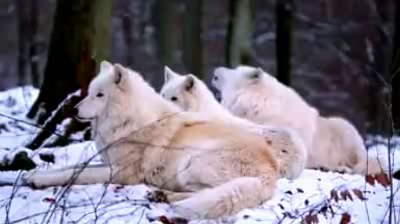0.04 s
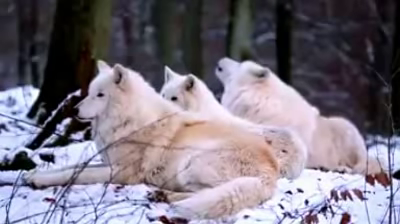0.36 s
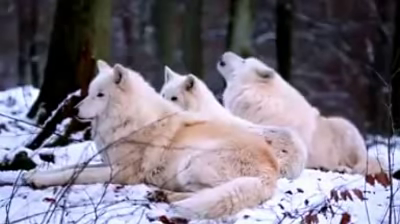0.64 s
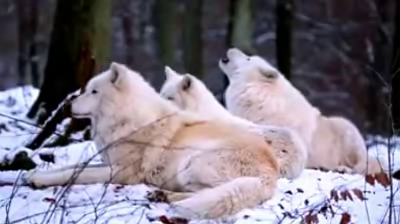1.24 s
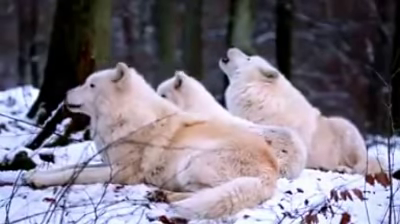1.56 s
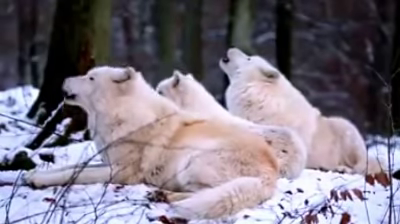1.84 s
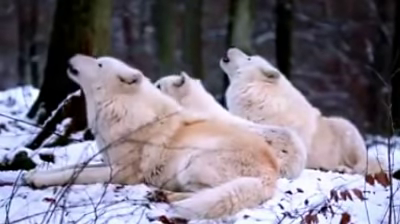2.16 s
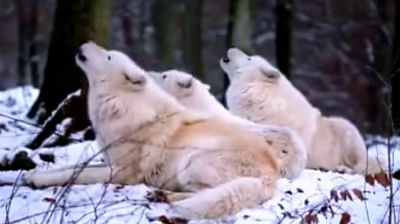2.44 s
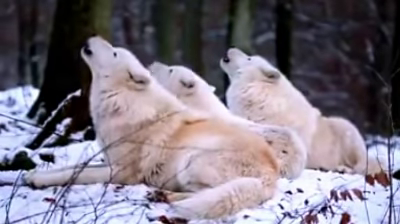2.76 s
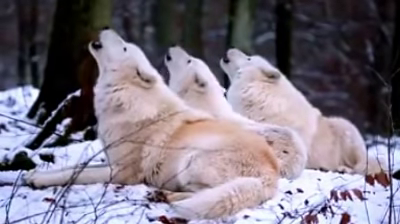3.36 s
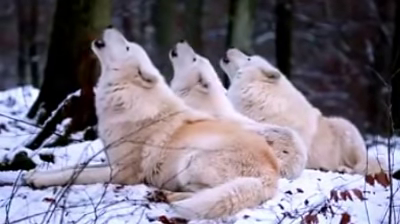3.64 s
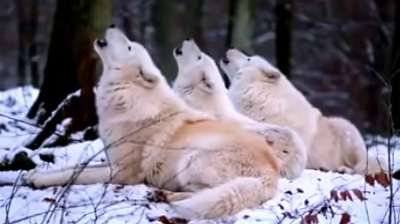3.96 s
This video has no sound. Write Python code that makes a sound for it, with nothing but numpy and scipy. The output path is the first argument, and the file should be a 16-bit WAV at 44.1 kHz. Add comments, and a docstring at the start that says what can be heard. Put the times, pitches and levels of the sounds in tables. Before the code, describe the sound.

Wolves howl in long overlapping tones over a faint hiss in a snowy forest.

```python
"""A far wolf howl sinks away over a steady hiss in a snowy forest. After a thin whine, a near wolf slides
up into one long, almost pure note; a second joins low, then breaks upward to a higher, airy note.
Each near voice is a strong fundamental with weak overtones, coloured by the throat and frayed while
hoarse. Trunks smear the howls and give a faint echo. Underneath lie a soft rush, dull bumps at the
microphone, a few rustles and one dry tick."""
import sys
import numpy as np
from scipy import signal
from scipy.fft import rfft, irfft
from scipy.io import wavfile
from scipy.ndimage import uniform_filter1d

SR = 44100
rng = np.random.default_rng(int(sys.argv[2]) if len(sys.argv) > 2 else 0)


def store_pcm(level_fs):
    """Save levels as 16-bit WAV."""
    pcm = np.round(np.clip(level_fs, -1, 1) * 32767).astype(np.int16)
    wavfile.write(sys.argv[1], SR, np.atleast_2d(pcm).T)


N = 176400
TIME = np.arange(N) / SR

# far wolf's falling howl: t/s, f/Hz, fundamental/dB, overtones/dB
FAR_HOWL = [(0, 453.2, -55, -71), (.14, 435, -50.5, -58), (.27, 423, -47.5, -56.5), (.39, 413, -60.5, -75),
            (.46, 407.8, -39.5, -55.5), (.505, 403, -52, -73), (.555, 394.3, -39.5, -64),
            (.61, 382.4, -62, -64), (.66, 378, -45.5, -57.5), (.72, 367, -55.5, -69), (.8, 359, -50, -71),
            (.9, 360.2, -43, -69), (1.05, 358, -45.5, -61), (1.16, 345, -78, -87)]
# colour of the hiss: f/Hz, relative level/dB
HISS_COLOUR = [(15, -23), (28, -5.5), (75, -6), (130, -6), (220, -10.5), (400, -9.5), (680, -9.5),
               (900, -13), (1150, -18.5), (1450, -14.5), (2200, -18.5), (3500, -22), (4300, -20),
               (5500, -27), (8000, -28), (12000, -34), (14500, -43)]
# colour of the midrange rush: f/Hz, relative level/dB
RUSH_COLOUR = [(100, -16.5), (250, -0.5), (450, 6), (800, -3), (1300, -2.5), (2000, -7.5), (4000, -11),
               (6000, -31)]
# fader ride of the rush: t/s, level/dB
RUSH_LEVEL = [(0, -51), (.14, -48.5), (.35, -53), (.7, -53), (1.1, -54.5), (2, -66), (3, -73), (4, -59.5)]
# stereo width of the noise layers: f/Hz, side against mid/dB
NOISE_WIDTH = [(60, -27.5), (400, -28), (2000, -19), (8000, -15.5), (14000, -19.5)]
# dull bumps: t/s, envelope peak/dB, f/Hz
BUMPS = [(.462, -44.5, 57), (0.97, -36, 109), (1.017, -31, 93), (1.031, -37, 59.7), (1.436, -40, 73.6),
         (2.231, -43, 65.03), (2.256, -29.5, 85.2), (2.282, -22.5, 91), (2.311, -35, 95),
         (2.355, -28.5, 135.8), (2.375, -38, 80)]
# thin whine: t/s, f/Hz, level/dB
WHINE = [(.74, 1540, -80), (.82, 1564, -57), (.93, 1532, -58), (1.02, 1529, -58), (1.12, 1570, -62),
         (1.2, 1570, -80)]
# soft rustles: peak t/s, half length/s, level/dB, centre f/Hz
RUSTLES = [(0.833, 0.017, -58, 5860), (1.113, 0.031, -60, 6950), (1.296, 0.043, -62, 7150),
           (1.7, 0.42, -66, 5870), (1.94, 0.021, -54.5, 7100), (2.066, 0.051, -56, 5900),
           (2.162, 0.021, -54.5, 6060), (2.3, 0.12, -62.5, 4435), (2.933, 0.048, -67, 9100)]
# lead wolf's melody: t/s, f/Hz
LEAD_PITCH = [(.95, 216), (1.0, 237), (1.06, 269), (1.12, 295.3), (1.2, 314), (1.28, 331.4), (1.37, 341.3),
              (1.5, 350.5), (1.72, 353.5), (1.92, 352), (2.1, 348.7), (2.3, 341.5), (2.55, 334.3),
              (2.82, 328.9), (3.15, 326.7), (3.6, 326.2), (3.8, 324.5), (4, 317.9)]
# its fundamental: t/s, level/dB
LEAD_LEVEL = [(.94, -63), (.968, -36), (1.06, -39), (1.125, -25.5), (1.175, -31), (1.22, -23.5),
              (1.28, -23), (1.305, -24.5), (1.368, -23.5), (1.39, -38), (1.41, -24.5), (1.52, -26.5),
              (1.54, -22.5), (1.62, -27), (1.65, -30.5), (1.71, -25.5), (1.755, -32.5), (1.81, -28),
              (1.92, -27.5), (1.95, -29), (2.07, -25), (2.14, -31.5), (2.21, -25), (2.245, -27.5),
              (2.271, -40), (2.3, -28), (2.345, -33.5), (2.39, -25), (2.432, -34), (2.49, -23.5),
              (2.54, -25), (2.61, -22), (2.7, -26.5), (2.77, -24), (2.85, -26.5), (2.95, -22.5),
              (3.12, -21), (3.35, -20.5), (3.49, -19), (3.58, -19), (3.74, -19), (3.9, -24), (4, -26)]
# its harmonics: t/s, second/dB, third/dB, higher ones before the throat/dB
LEAD_OVERTONES = [(.93, -73, -75, -80), (1.0, -39, -52.5, -59), (1.06, -45, -45.5, -71),
                  (1.12, -49.5, -52.5, -65.5), (1.28, -39, -53.5, -57), (1.45, -37.5, -47.5, -49),
                  (1.62, -41, -46, -48.5), (1.8, -47, -41.5, -48), (2.07, -43.5, -45.5, -48.5),
                  (2.2, -44, -48, -52), (2.6, -46, -39, -55.5), (2.9, -51, -47, -54),
                  (3.25, -46, -41.5, -54.5), (3.48, -47.5, -37.5, -52), (3.7, -48, -38.5, -57),
                  (3.82, -48, -36, -63), (4, -58.5, -35.5, -63)]
# its throat's colour on the higher harmonics: f/Hz, gain/dB
LEAD_THROAT = [(1000, -10), (1310, 2), (1410, -2.5), (1570, -4), (1750, -9), (1960, -8), (2100, -16.5),
               (2290, -9), (2460, -8.5), (2750, -27), (3700, -23.5), (4250, -22)]
# a narrow, moving throat resonance that picks out one overtone after another: t/s, f/Hz, gain/dB
LEAD_RING = [(1.1, 1544, 4), (1.21, 1550, 11), (1.32, 1705, 1.5), (1.5, 2450, -4), (1.62, 2470, 5),
             (1.8, 2453, -8), (2.03, 2470, 1.5), (2.15, 1734, 5), (2.4, 1702, 8.5), (2.6, 1681, -1.5),
             (2.85, 1690, 5.5), (3.15, 1925, 7), (3.5, 1990, 8.5), (3.63, 1955, 10), (3.75, 1955, 3)]
# its hoarseness: t/s, amount/0-1
LEAD_HOARSE = [(.95, .4), (1.15, .6), (1.35, .4), (1.9, .22), (2.3, .35), (2.65, .15), (4, .1)]
# moments when the stereo image opens: start t/s, end t/s
OPENINGS = [(1.202, 1.29), (1.48, 1.556), (1.81, 1.89), (2.28, 2.36), (2.47, 2.85), (3.26, 3.52),
            (3.861, 4)]
# joining wolf's howl: t/s, f/Hz, fundamental/dB, second harmonic/dB, higher ones before the throat/dB
JOINER_HOWL = [(3.1, 276, -74.5, -56.5, -73.5), (3.26, 275, -64, -47, -76),
               (3.29, 273.6, -41.5, -52.5, -62), (3.37, 297.2, -36, -43.5, -51),
               (3.42, 316, -34.5, -44.5, -55.5), (3.5, 339, -27, -36.5, -62.5),
               (3.556, 362.8, -30.5, -41, -40.5), (3.567, 439.7, -27.5, -44.5, -61.5),
               (3.6, 460, -21.5, -44, -47), (3.63, 464.6, -21.5, -43, -44), (3.69, 461.7, -22.5, -45, -44),
               (3.75, 467, -19, -47, -44), (3.82, 469.3, -22, -49.5, -43), (3.91, 470.3, -23, -46, -45.5),
               (4, 469.4, -19, -53, -44)]
# its throat's colour on the higher harmonics: f/Hz, gain/dB
JOINER_THROAT = [(820, -7.5), (1060, -2), (1410, -8.5), (1600, -31), (1880, -23.5), (2350, -13.5),
                 (2800, -25), (3760, -30)]
# its piercing ninth harmonic: t/s, level/dB
JOINER_EDGE = [(3.54, -80), (3.58, -64), (3.67, -61), (3.745, -66), (3.772, -53.5), (3.86, -55),
               (3.94, -51), (4, -50.5)]
# its hoarseness: t/s, amount/0-1
JOINER_HOARSE = [(3.1, .7), (3.4, 0.59), (3.5, 0.44), (3.57, 0.83), (3.63, .25), (4, 0.066)]
# colour of the air in its voice: f/Hz, relative level/dB
AIR_COLOUR = [(80, -19), (300, 0), (700, 10), (1100, -20), (1600, 1), (3000, -29), (4400, -11.5),
              (5800, -17), (9000, -13), (12000, -22.5), (15000, -42)]
# colour of the tick: f/Hz, relative level/dB
TICK_COLOUR = [(1000, -32.5), (1900, 3), (3000, -0.5), (3900, 4), (5000, -8.5), (7500, -8.5), (10000, -19),
               (14000, -29.5)]


def from_db(db):
    """Decibels to gain."""
    return 10 ** (np.asarray(db) / 20)


def rms_one(x):
    """Scale to unit rms."""
    return x / np.sqrt(np.mean(x ** 2) + 1e-20)


def in_time(rows):
    """One smooth automation curve for each column after the time."""
    times, *columns = np.transpose(rows)
    return [uniform_filter1d(np.interp(TIME, times, column), size=300) for column in columns]


def at_hz(points, hz):
    """Read an EQ curve in dB on a log-frequency axis."""
    f, db = np.transpose(points)
    return np.interp(np.log(hz), np.log(f), db)


def drift(rate_hz):
    """Smooth random modulation with spread 1."""
    step, run_in = 40, 2000
    pole = np.exp(-2 * np.pi * rate_hz * step / SR)
    white = rng.standard_normal(N // step + run_in + 2)
    slow = signal.lfilter([1], [1, -2 * pole, pole * pole], white)[run_in:]
    return np.interp(np.arange(N) / step, np.arange(len(slow)), rms_one(slow))


def stereo(mid, side):
    """Left and right from mid and side."""
    return mid + side * np.array([[1], [-1]])


def pan(x, db):
    """Place a sound by its left-right level difference."""
    return x * from_db([[db / 2], [-db / 2]])


def tone(hz):
    """A sine of rms 1 that follows a pitch curve."""
    return np.sqrt(2) * np.sin(2 * np.pi * np.cumsum(hz) / SR)


def noise(colour):
    """Narrow stereo noise of a given colour, rms 1."""
    hz = np.maximum(np.fft.rfftfreq(N, 1 / SR), 1)
    mid, side = rfft(rng.standard_normal((2, N))) * from_db(at_hz(colour, hz))
    side *= from_db(at_hz(NOISE_WIDTH, hz))
    return rms_one(stereo(irfft(mid, N), irfft(side, N)))


def far_wolf(waver=.025, flutter_db=3):
    """A wavering, sinking howl, blurred by the trees and heard from one direction."""
    hz, db, overtones_db = in_time(FAR_HOWL)
    hz = hz * (1 + waver * drift(71))
    overtones = tone(2 * hz) + tone(3 * hz)
    howl = from_db(db) * tone(hz) + from_db(overtones_db) * overtones
    flutter = from_db(flutter_db * drift(10))
    return scattered(howl * flutter * (TIME < FAR_HOWL[-1][0]), share=.6)


def scattered(x, share):
    """Part of the sound arrives by way of the trunks: glides smear, held tones swell and fade."""
    return np.sqrt(1 - share) * x + np.sqrt(share) * forest(x, t60_s=.5)[0]


def forest(x, t60_s, build_s=.022, dull_hz=2940):
    """Dull, dying scatter from many trunks, different on each side."""
    t = TIME[:SR]
    echoes = rng.standard_normal((2, SR)) * from_db(-60 * t / t60_s) * (1 - np.exp(-t / build_s))
    echoes /= np.sqrt(np.sum(echoes ** 2, axis=1, keepdims=True))
    echoes = signal.sosfilt(signal.butter(1, dull_hz, fs=SR, output="sos"), echoes)
    return signal.fftconvolve(x[None], echoes, axes=1)[:, :N]


def hiss(level_db=-50, patch_db=1.8, patch_hz=260, patch_s=.1):
    """A steady bed of noise in which narrow bands swell and thin at random."""
    hz, times, bands = signal.stft(noise(HISS_COLOUR), SR, nperseg=1024)
    swell = rng.standard_normal(bands.shape[1:])
    swell = uniform_filter1d(swell, size=round(patch_hz / hz[1]), axis=0)
    swell = uniform_filter1d(swell, size=round(patch_s / times[1]), axis=1)
    _, patchy = signal.istft(bands * from_db(patch_db * rms_one(swell)), SR, nperseg=1024)
    return from_db(level_db) * rms_one(patchy[:, :N])


def rush():
    """Soft midrange noise that fades early and creeps back at the end."""
    db, = in_time(RUSH_LEVEL)
    return from_db(db) * noise(RUSH_COLOUR)


def bumps(rise_cycles=.48):
    """Each soft knock swells and dies within about two low cycles."""
    out = np.zeros(N)
    for start, db, hz in BUMPS:
        cycles = np.maximum(TIME - start, 0) * hz
        age = cycles / rise_cycles
        envelope = (age * np.exp(1 - age)) ** 2
        out -= from_db(db) * envelope * np.sin(2 * np.pi * cycles)
    return out


def whine(waver=.0107):
    """A faint, unsteady high tone that leads into the first near howl."""
    hz, db = in_time(WHINE)
    gate = (TIME > WHINE[0][0]) & (TIME < WHINE[-1][0])
    return from_db(db) * tone(hz * (1 + waver * drift(71))) * gate


def rustles(half_width_octaves=.28):
    """Bell-shaped swells of bright noise."""
    out = np.zeros(N)
    for peak_s, half_s, db, hz in RUSTLES:
        edges = hz * 2 ** (half_width_octaves * np.array([-1, 1]))
        band = signal.sosfilt(signal.butter(2, edges, "band", fs=SR, output="sos"), rng.standard_normal(N))
        swell = np.exp(-.5 * ((TIME - peak_s) / half_s) ** 2)
        out += from_db(db) * rms_one(band) * swell
    return out


def lead_wolf(ring_half_width_hz=97, tremble_settle_s=.47, wobble_settle_s=.97):
    """One long howl that slides up with a rough tremble, calms and slowly sags."""
    hz, = in_time(LEAD_PITCH)
    db, = in_time(LEAD_LEVEL)
    hoarse, = in_time(LEAD_HOARSE)
    second_db, third_db, upper_db = in_time(LEAD_OVERTONES)
    ring_hz, ring_db = in_time(LEAD_RING)
    overtones_db = [second_db, third_db]
    for harmonic in range(4, 13):
        detune = (harmonic * hz - ring_hz) / ring_half_width_hz
        throat_db = at_hz(LEAD_THROAT, harmonic * hz) + ring_db / (1 + detune ** 2)
        overtones_db.append(upper_db + throat_db)
    age = TIME - LEAD_LEVEL[0][0]
    tremble = 1 + .39 * np.exp(-np.abs(age) / tremble_settle_s) * drift(13.5)
    wobble = 1 + .0088 * np.exp(-np.abs(age) / wobble_settle_s) * drift(14)
    return voice(hz * wobble, db, overtones_db, hoarse) * tremble * (age > 0)


def voice(hz, fundamental_db, overtones_db, hoarse, waver=.0019, rasp=.017):
    """A fundamental and its overtones, frayed and smeared while hoarse, clean once the voice settles."""
    hz = hz * (1 + waver * drift(10.1) + rasp * hoarse * drift(71))
    overtones = 0
    for harmonic, db in enumerate(overtones_db, start=2):
        shimmer_db = .4 * (harmonic - 1) * drift(15)  # higher overtones flutter more
        overtones += from_db(db - shimmer_db) * frayed_tone(harmonic * hz, hoarse)
    return from_db(fundamental_db) * tone(hz) + scattered(overtones, share=.5 * hoarse ** 2)


def frayed_tone(hz, hoarse):
    """A sine of rms 1 that blends with a narrow band of noise as the voice grows hoarse."""
    phase = 2 * np.pi * np.cumsum(hz) / SR
    blend = .62 * hoarse
    fray = drift(55) * np.sin(phase) + drift(55) * np.cos(phase)
    return np.sqrt(1 - blend ** 2) * tone(hz) + blend * fray


def joining_wolf(air_db=-28.5, air_follows=.79):
    """A low rising moan that breaks upward into a loud, airy high note."""
    hz, db, second_db, upper_db = in_time(JOINER_HOWL)
    edge_db, = in_time(JOINER_EDGE)
    hoarse, = in_time(JOINER_HOARSE)
    higher_db = [upper_db + at_hz(JOINER_THROAT, harmonic * hz) for harmonic in range(3, 9)]
    howl = voice(hz, db, [second_db, *higher_db, edge_db], hoarse)
    peak_db = db.max()  # the air rides the fundamental, air_db below it at the peak
    air = from_db(peak_db + air_db + air_follows * (db - peak_db)) * noise(AIR_COLOUR)
    return (howl + air) * (TIME > JOINER_HOWL[0][0])


def tick(peak_s=3.326, level_db=-41.5, attack_s=.003, decay_s=.011):
    """One quick, dry burst of bright noise."""
    age = TIME - peak_s
    envelope = np.exp(-np.maximum(-age / attack_s, age / decay_s))
    return from_db(level_db) * envelope * noise(TICK_COLOUR)


def stereo_image(x, fade_s=.036, narrow_db=-42.5, open_db=7.5):
    """The mix sits in the centre and widens for moments during the howls."""
    opening = np.zeros(N)
    for start, end in OPENINGS:
        inside_s = np.minimum(TIME - start, end - TIME)
        opening += np.clip(inside_s / fade_s + .5, 0, 1)
    side_gain = from_db(narrow_db) + from_db(open_db) * opening
    left, right = x
    return stereo((left + right) / 2, (left - right) / 2 * side_gain)


def scene():
    """Two near wolves and their echo in front; the far wolf, noise bed and small sounds behind."""
    near = pan(lead_wolf(), db=-.3) + pan(joining_wolf(), db=.3)
    echo = from_db(-22) * forest(near.mean(axis=0), t60_s=.93)
    bed = hiss() + rush()
    return stereo_image(near + echo + bed + far_wolf() + whine() + bumps() + rustles() + tick())


def record(dry, silence_s=.035, cutoff_hz=14700):
    """The sound starts after a moment of silence; a steep low-pass takes off the very top."""
    low_pass = signal.ellip(10, .1, 80, cutoff_hz, fs=SR, output="sos")
    return signal.sosfilt(low_pass, dry * (TIME > silence_s))


dry = scene()
out = record(dry)
store_pcm(out)
```